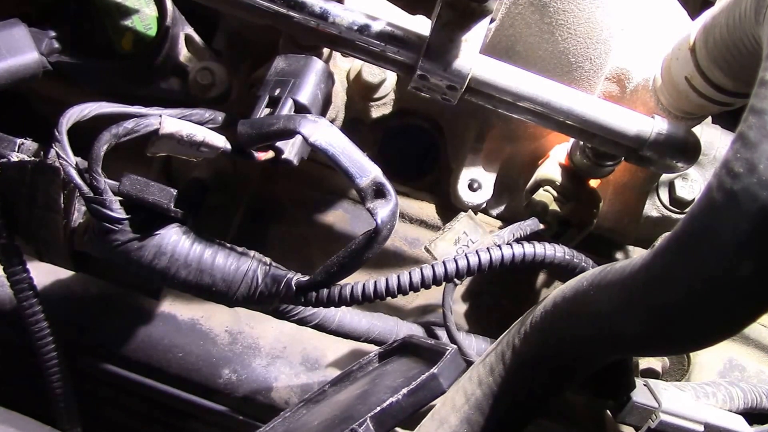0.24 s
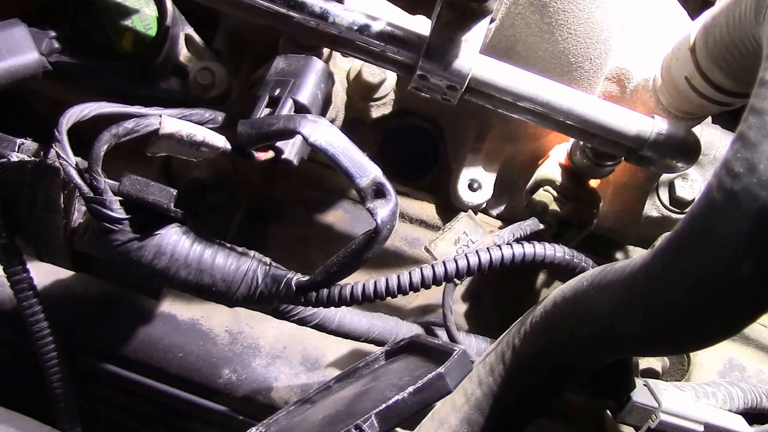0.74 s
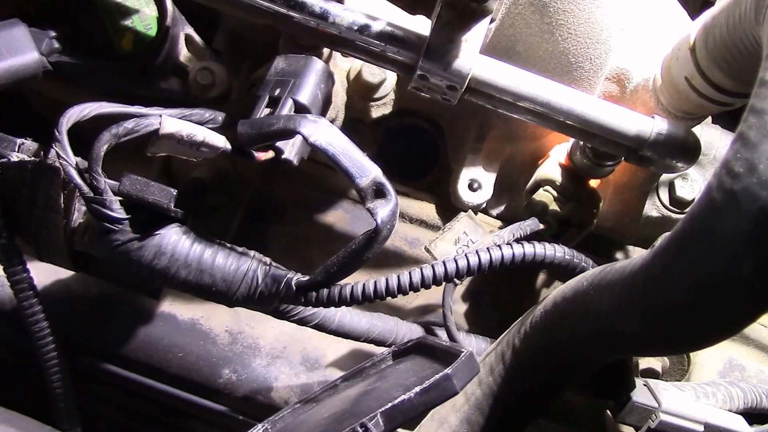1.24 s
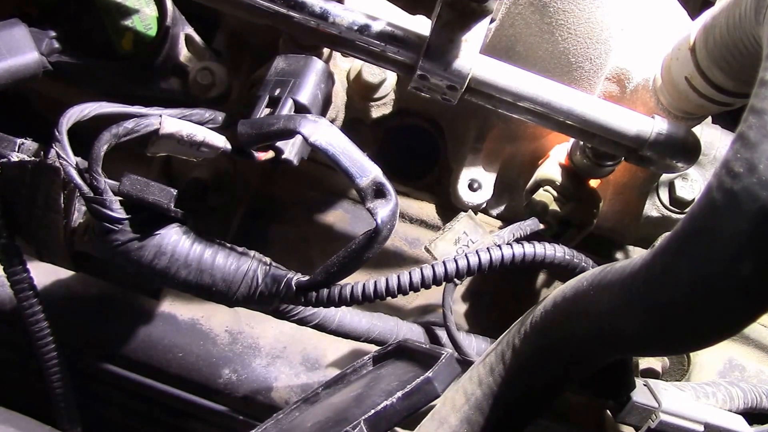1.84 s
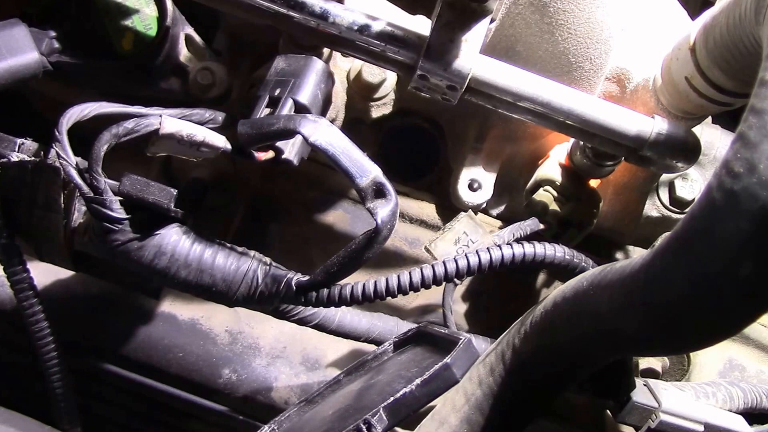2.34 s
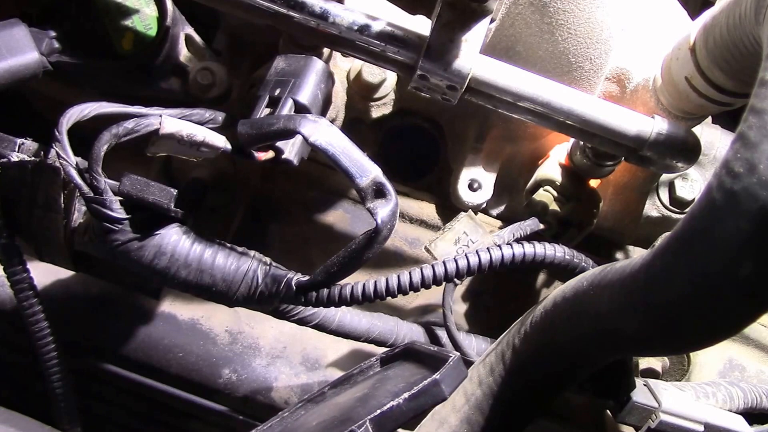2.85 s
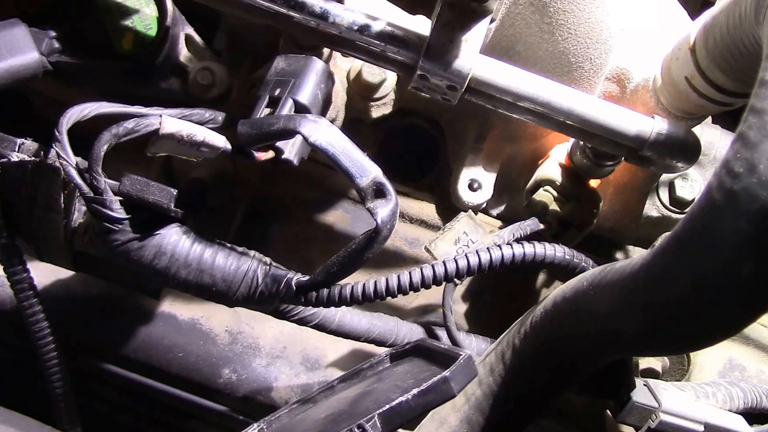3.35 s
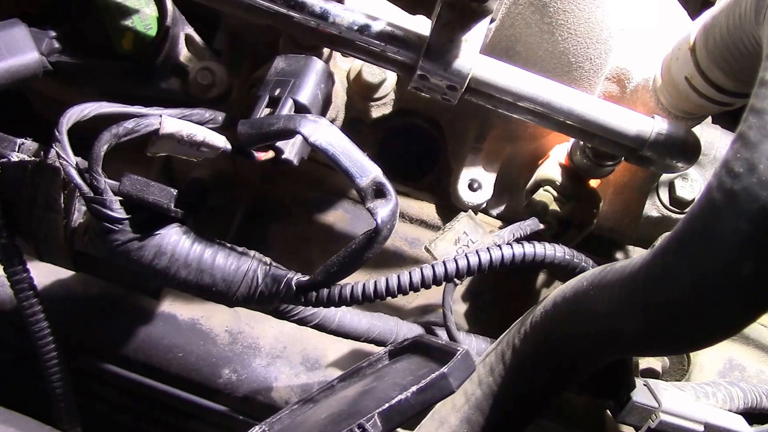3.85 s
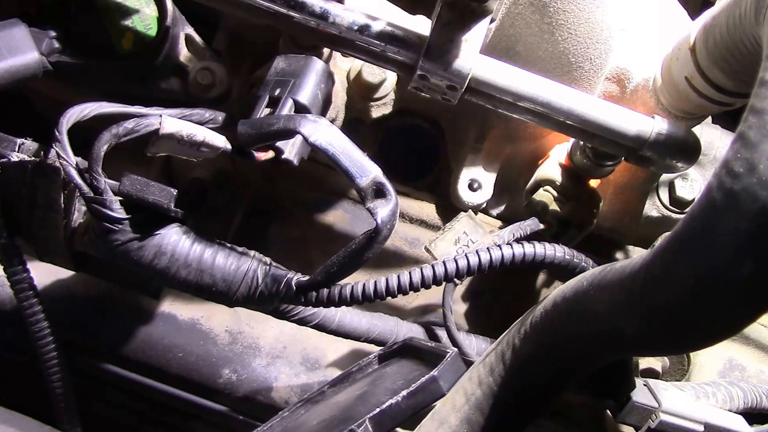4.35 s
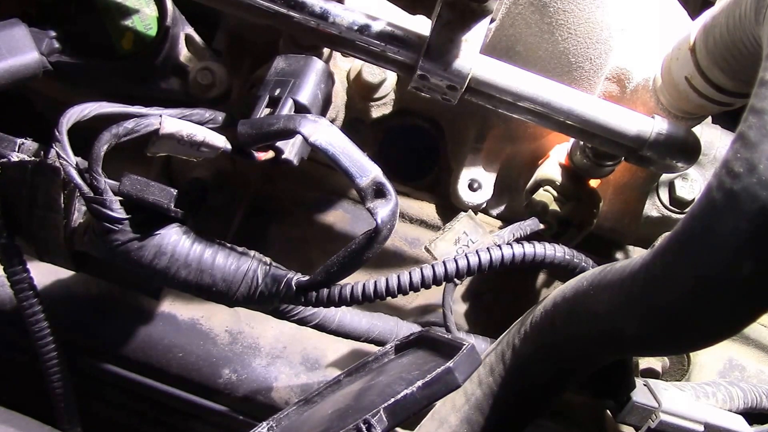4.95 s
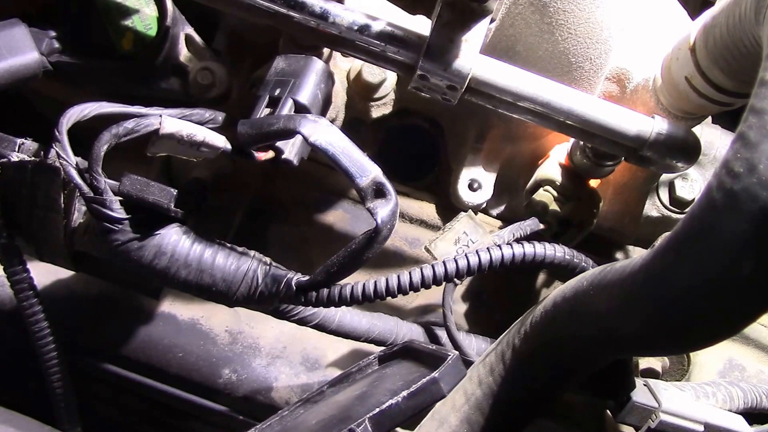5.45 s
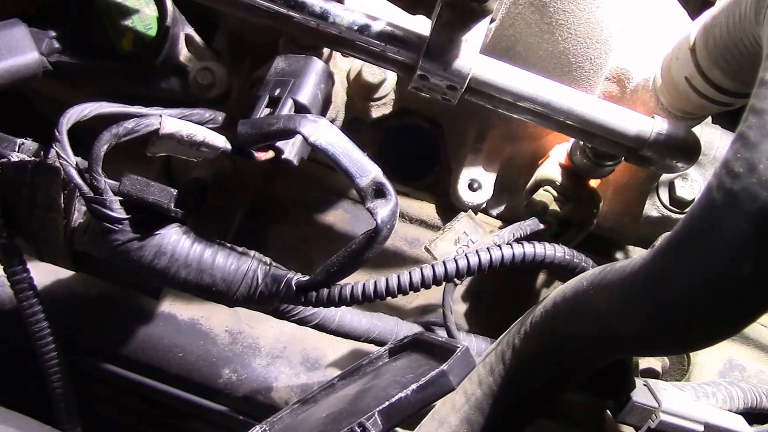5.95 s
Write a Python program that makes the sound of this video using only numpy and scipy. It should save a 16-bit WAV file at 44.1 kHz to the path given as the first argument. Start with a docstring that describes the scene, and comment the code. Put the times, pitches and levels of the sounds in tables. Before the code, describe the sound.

Steel hand tools are picked up, knocked together and put down on sheet metal close by. A short clatter opens, followed by a pause of about a second and another burst. Then comes a busier stretch of sharp knocks, high ringing clinks and brief scrapes as tools slide across the metal. The garage adds a short echo, and faint distant traffic hums underneath.

```python
"""A garage with an open door: steel hand tools are picked up, knocked and put down on sheet metal.
Each knock is a short clatter of tiny contacts, and loose tools ring on at their own pitches until a
hand stops them. Between knocks, things slide over the sheet. The room adds a short echo.
Far traffic, insects and one two-voiced bird chirp come in from outside."""
import sys
import numpy as np
from scipy import signal
from scipy.fft import rfft, irfft, next_fast_len
from scipy.io import wavfile
from scipy.ndimage import uniform_filter1d, map_coordinates

SR = 44100
rng = np.random.default_rng(int(sys.argv[2]) if len(sys.argv) > 2 else 0)


def dump_mix(stems):
    """Bounce the given channels to the path in sys.argv[1] as a 16-bit WAV at rate SR."""
    frames = np.atleast_2d(stems).T  # one column per channel
    limited = np.clip(frames, -1, 1)  # hard clip at full scale
    pcm = np.round(limited * 32767).astype(np.int16)
    wavfile.write(sys.argv[1], SR, pcm)


N = 273861


def amp(db):
    """Turn decibels into a number to multiply by."""
    return 10 ** (np.asarray(db) / 20)


def unit(x):
    """Scale a sound to an average (rms) level of 1."""
    return x / np.sqrt(np.mean(x ** 2) + 1e-20)


def along(points, hz):
    """Read between (Hz, value) points, giving each octave equal room."""
    point_hz, values = np.transpose(points)
    return np.interp(np.log(hz + 1), np.log(point_hz + 1), values)


def curves(rows):
    """Join rows of (seconds, values..) into one curve per value."""
    times, *columns = np.transpose(rows)
    return [np.interp(np.arange(N) / SR, times, column) for column in columns]


def wobble(rate, size=N):
    """A smooth curve through `rate` random values a second."""
    knots = rng.standard_normal(int(size * rate / SR) + 4)
    return map_coordinates(knots, [np.arange(size) * rate / SR])


def lowpass(hz, edge_hz, steepness):
    """A gain near 1 below the edge that falls toward 0 above it."""
    return 1 / (1 + (hz / edge_hz) ** steepness)


def filtered(x, response):
    """Scale each frequency of x by response(hz)."""
    size = next_fast_len(len(x) + 2048)
    return irfft(rfft(x, size) * response(np.fft.rfftfreq(size, 1 / SR)), size)[:len(x)]


def add(track, start_s, sound):
    """Mix a sound into the track."""
    spot = track[max(round(start_s * SR), 0):][:len(sound)]
    spot += sound[:len(spot)]


# The tone of the metal sheet, for knocks and slides. Each row: frequency in Hz, level in dB.
SHEET_TONE = [(35, -76), (60, -46.5), (666, 0.5), (2300, -2.5), (4030, -5), (6580, -7), (9130, -11),
              (9790, -9.5), (11000, -14.5), (14900, -26), (16000, -39)]
# Where a knock's body, clack, edge and tick have their levels set. Each row: from Hz, to Hz.
PART_BANDS = [(300, 1200), (1200, 4300), (5650, 6350), (9700, 10300)]
# Tools hitting the sheet. Each row: time in seconds, rough peak level of the clack in dB, its pitch
# in Hz, body level relative to the clack in dB, hardness in dB, seconds to fade by 60 dB.
SHEET_KNOCKS = [(0.0034, -16, 2560, -8, 3.3, 0.11), (0.0763, -23.5, 2670, -12, -5, 0.11),
                (0.302, -7, 2070, -13, -5.5, 0.13), (0.3464, -15.5, 1390, -12, 8, 0.18),
                (0.4299, -9.5, 3170, -18, 10.3, 0.12), (0.4647, -7, 3110, -11.5, -5, 0.13),
                (0.5321, -13.5, 2530, -14.5, 1.5, 0.097), (0.7141, -30, 2930, -13, -9, 0.08),
                (1.8566, -7, 1560, -15.5, 1.4, 0.091), (1.9286, -26, 2020, -11, -8, 0.15),
                (1.9737, -18, 3300, -15.5, 4, 0.19), (2.0276, -4.5, 3220, -17, 6.8, 0.078),
                (2.0479, -6, 1600, -15, 5, 0.1), (2.0747, -12, 3070, -7.5, 11.5, 0.13),
                (2.2058, -23, 4200, -12, 2.8, 0.12), (2.7807, -21.5, 2500, -20, -3, 0.11),
                (2.8433, -27, 1430, -9, -14, 0.14), (2.9419, -7.5, 3350, -15.5, 2.5, 0.15),
                (3.0283, -11, 2220, -10, -5.5, 0.13), (3.073, -15.5, 1900, -26, 3, 0.12),
                (3.1522, -11.5, 2300, -25, 3.2, 0.27), (3.2219, -1, 4550, -21, 0.1, 0.082),
                (3.4237, -27, 3000, -29, -5.2, 0.22), (3.7648, -6.5, 2200, -12, 2, 0.16),
                (3.7984, -10.5, 2080, -13.5, -9, 0.13), (3.8599, -13, 3700, -16.5, -18, 0.2),
                (3.9034, -13, 2570, -14, 4.5, 0.099), (3.9874, -19, 3740, -17, -2, 0.15),
                (3.9961, -11.5, 3740, -13.5, -5, 0.074), (4.0234, -16.5, 1663, -11, 0.1, 0.1),
                (4.0906, -21, 2730, -14, 0.5, 0.11), (4.2542, -19.5, 2510, -7.5, -4.5, 0.085),
                (4.3885, -20.5, 1980, -9, -18, 0.086), (4.4306, -31, 3060, -8, 2, 0.11),
                (4.4559, -19, 1520, -14, -2, 0.14), (4.4944, -12, 2500, -11.5, 0.8, 0.15),
                (4.6503, -16.5, 2700, -15, 7, 0.16), (4.7321, -1, 2300, -19.5, 2.6, 0.099),
                (4.7672, -3, 2340, -8, 3.3, 0.1), (4.7884, -7.5, 2410, -14.5, 4, 0.09),
                (4.8424, -9.5, 3080, -11, 5, 0.069), (4.962, -16.5, 2780, -9, 3, 0.078),
                (5.2554, -28.5, 1280, -8, 3.5, 0.083), (5.3974, -31.5, 4040, -8, 9, 0.088),
                (5.5487, -18.5, 2390, -13, -0.7, 0.15), (5.6358, -9.5, 2080, -5, -2.5, 0.071),
                (5.6543, -18, 2410, -3, 0, 0.062), (5.7715, -18, 3260, -25, -1, 0.11),
                (5.7786, -18, 3160, -12, 6, 0.12), (5.7978, -14.5, 1290, -14, 8, 0.15),
                (5.9125, -3.5, 1730, -9, 7.2, 0.11), (5.9334, -5, 2500, -10.5, -12, 0.1),
                (6.1976, -33.5, 3320, -18, 0.1, 0.12)]


def knocks():
    """A cluster of tiny contacts makes a low body, a pitched clack, a bright edge and a high tick."""
    out, t = np.zeros(N), np.arange(SR // 3) / SR
    hz = np.fft.rfftfreq(len(t), 1 / SR)
    below = [lowpass(hz, edge_hz, 6) for edge_hz in (1200, 4500, 8000)]
    parts = np.diff([np.zeros_like(hz), *below, np.ones_like(hz)], axis=0)
    bands = np.array([(hz > low) & (hz < high) for low, high in PART_BANDS])
    rise_s, crest_db = 0.0033, 4  # the crest is how far peaks stand above the average
    for time_s, db, clack_hz, body_db, hard_db, fade_s in SHEET_KNOCKS:
        contacts = unit(rng.standard_normal(len(t)) * amp(2.3 * wobble(242, size=len(t))))
        # random bumps in the tone make every knock a little different
        bumps_db = 1.5 * map_coordinates(rng.standard_normal(80), [12 * np.log(hz / 40 + 1)])
        clack_db = 4 / (1 + (5 * np.log2((hz + 1) / clack_hz)) ** 2)
        sheet = amp(along(SHEET_TONE, hz) + clack_db)
        edge_db, tick_db = -10.5 + hard_db, -25.5 + 1.1 * hard_db  # harder is brighter
        band_levels = np.sqrt(bands @ sheet ** 2 / len(hz))
        gains = amp([body_db, 0, edge_db, tick_db]) / band_levels
        clatter = irfft(rfft(contacts) * sheet * amp(bumps_db) * (gains @ parts), len(t))
        shape = (1 - np.exp(-t / rise_s)) ** 2 * amp(-60 * t / fade_s)
        add(out, time_s - .0045, amp(db - crest_db) * shape * clatter)
    return out


# The tone of far traffic. Each row: frequency in Hz, level in dB.
TRAFFIC_TONE = [(15, -69), (25, -46.5), (223, -8.5), (463, -8.5), (503, -6.5), (775, -5.5), (840, -7.5),
                (1100, -7.5), (1330, -11.5), (2690, -14), (9840, -24), (11300, -30.5), (16000, -43)]
# The background hiss. Each row: time in seconds, change of the treble in dB.
BACKGROUND_HISS = [(.25, 1.5), (.8, 4.5), (1.3, 0), (1.8, -3), (2.4, 1.5), (3.55, 3.5), (5.1, 3.5)]


def traffic_and_hiss():
    """Far traffic rumbles; background hiss lingers after the first knocks, then dips and returns."""
    roar = unit(filtered(rng.standard_normal(N), lambda hz: amp(along(TRAFFIC_TONE, hz))))
    hiss = filtered(roar, lambda hz: 1 - lowpass(hz, 1500, 4))
    rumble = roar - hiss
    hiss_db, = curves(BACKGROUND_HISS)
    return amp(-51.5 + 0.29 * wobble(5.4)) * (rumble + amp(hiss_db) * hiss)


# Insects outside. Each row: pitch in Hz, width of the band in Hz, level in dB.
INSECT_BANDS = [(11020, 210, -68), (13000, 400, -76)]


def insects():
    """Insects are heard as high, narrow bands of noise that throb."""
    out = np.zeros(N)
    for pitch_hz, width_hz, db in INSECT_BANDS:
        band = filtered(rng.standard_normal(N), lambda hz: 1 / (1 + (2 * (hz - pitch_hz) / width_hz) ** 2))
        out += amp(db + 1.7 * wobble(25)) * unit(band)
    return out


# How long the room echoes. Each row: frequency in Hz, seconds to fade by 60 dB.
ECHO_FADES = [(200, 0.76), (1000, 0.4), (4000, 0.36), (10000, 0.24), (16000, 0.29)]


def garage_echo(x):
    """A short, smooth room echo in which each frequency dies at its own speed."""
    out, step = np.zeros(N), SR // 5
    for start in range(0, N, step):  # drawn afresh from noise every fifth of a second
        hz, t, noise = signal.stft(rng.standard_normal(SR // 2), SR, nperseg=256)
        fade = amp(-60 * t / along(ECHO_FADES, hz)[:, None])
        _, tail = signal.istft(noise * fade, SR, nperseg=256)
        echo = signal.fftconvolve(x[start:start + step], tail / np.linalg.norm(tail))
        add(out, start / SR + .005, echo)
    return out


# Things dragged over the sheet. Each row: start, loudest moment and end in seconds,
# level in dB, brightness in dB (turns the sharp part up and the dull part down).
SHEET_SLIDES = [(.24, .29, .31, -47, 7), (2.61, 2.92, 3.03, -40, 7.5), (2.92, 3.095, 3.416, -26.5, 4),
                (3.57, 3.679, 3.838, -35, 13), (4.04, 4.115, 11, -50.5, -5), (4.587, 4.752, 4.77, -21, 5),
                (4.826, 4.889, 4.93, -28, 1.5), (5.173, 5.214, 5.3, -60, 10)]


def slides():
    """Steel dragged over the sheet makes dense, uneven grains that swell and ease off."""
    level, bright_db, t = np.zeros(N), np.zeros(N), np.arange(N) / SR
    for start, loudest, end, db, brightness in SHEET_SLIDES:
        sliding = (t >= start) & (t < end)
        swell_db = np.interp(t[sliding], [start, loudest, end], [-26.5, 0, -16.5])
        level[sliding] = amp(db + swell_db)
        bright_db[sliding] = brightness

    def sharp_tone(hz):
        tilt_db = -9.5 * np.log2(hz / 2500 + 1)
        return amp(along(SHEET_TONE, hz) + tilt_db) * (1 - lowpass(hz + 1, 2500, 2))

    grains = rng.standard_normal(N) * amp(1.2 * wobble(180) + 2.6 * wobble(35))
    dull = unit(filtered(grains, lambda hz: amp(along(SHEET_TONE, hz)) * lowpass(hz, 2500, 2)))
    sharp = unit(filtered(grains, sharp_tone))
    scrape = (amp(-bright_db) * dull + amp(bright_db) * sharp) / 2
    return uniform_filter1d(level, size=400) * scrape


def ringing(modes, hardness, t):
    """A struck tool sounds all its own pitches (modes) at once; a hard blow favours the high ones."""
    hz, level_db, fade_s = np.array(modes)[:, :, None]
    level_luck, phase_luck = rng.standard_normal((2, len(hz), 1))
    level_db = level_db + hardness * np.log2(hz / 7000) + 1.5 * level_luck
    # the tool chatters on what it touches, so each mode flutters in level and phase
    flutter_db = 3 * np.array([wobble(46, size=len(t)) for _ in hz])
    phase_slip = 0.9 * np.array([wobble(40, size=len(t)) for _ in hz])
    tones = np.sin(2 * np.pi * hz * t + np.pi * phase_luck + phase_slip)
    return np.sum(amp(level_db + flutter_db - 60 * t / fade_s) * tones, axis=0)


# How the tools ring. Each tool has three lists: pitches in Hz, levels in dB, seconds to fade by 60 dB.
TOOL_MODES = { "ratchet": ([3260, 4823, 4915, 5518, 6980, 7088, 8640, 9447, 11305, 12468, 13600, 15122, 15300],
              [-10, -7, -6, -9, -2, -2, -13, -4, -14, -23, -26, -29, -26],
              [.12, .33, .3, .6, .3, .4, .4, .26, .3, .3, .25, .25, .12]),
              "extension": ([1440, 2500, 2980, 6515, 6955, 7655, 8865, 10850, 11654, 13030, 13910, 14280, 14922],
              [-21, -19, -14, -3, 0, -9, -9, -18, -5, -20, -24, -21, -22],
              [.15, .15, .2, .18, .28, .45, .25, .19, .2, .14, .2, .18, .2]),
              "socket": ([3716, 5119, 5184, 6803, 6855, 7800, 8552, 10430, 10570, 12905, 13110, 14570, 15500],
              [-7, 0, -8, -9, -9, -13, -10, -13, -11, -18, -15, -26, -26],
              [.3, .42, .4, .3, .3, .3, .3, .25, .3, .2, .2, .15, .2]),
              "bit": ([4468, 5465, 8365, 8908, 11330, 11880, 12550], [-8, -5, -3, 0, -6, -10, -22],
              [.15, .15, .13, .25, .12, .23, .2]), "spanner": ([5420, 8900, 9900], [0, -21, -18],
              [.08, .2, .3]), "bolt": ([8700, 15300], [0, -15], [.15, .25]), "bracket": ([6405], [0], [.4]),
              "clamp": ([2020], [0], [.1]), "washer": ([4080], [0], [.15]), "nut": ([9650], [0], [.1]), }
# Blows that ring a tool. Each row: start in seconds, level in dB, hardness in dB per octave,
# seconds of free ringing, name of the tool.
TOOL_BLOWS = [ (0.347, -21.5, 6, 0.074, "ratchet"), (.429, -16.5, -7.5, 0.054, "extension"),
              (.431, -22.5, -8, .35, "ratchet"), (.447, -17, 2, .2, "extension"),
              (0.497, -29, 2, 0.13, "extension"), (0.71, -53, -12.5, .1, "extension"),
              (1.905, -42, -13, .07, "ratchet"), (1.975, -20, 2, 0.01, "ratchet"),
              (1.988, -17.5, -3.5, 0.034, "ratchet"), (2.032, -11, 4, 0.012, "ratchet"),
              (2.052, -14, 3, 0.046, "ratchet"), (2.074, -21, 3, 0.016, "extension"),
              (2.09, -28.5, 11, 0.105, "ratchet"), (2.206, -26.5, 6, 0.088, "nut"),
              (2.207, -43, 9, 0.068, "ratchet"), (2.81, -38, -3, .03, "washer"),
              (2.875, -61, 0, .06, "socket"), (2.943, -35.5, 18, 0.035, "bit"),
              (3.085, -30.5, 7, .04, "socket"), (3.143, -25, 2, 0.017, "nut"),
              (3.221, -24.5, -5, 0.037, "socket"), (3.73, -30.5, -1, 0.022, "clamp"),
              (3.798, -18.5, 1.5, 0.048, "socket"), (3.858, -19.5, -4, 0.05, "socket"),
              (3.91, -27.5, 4.5, 0.054, "socket"), (3.997, -22.5, 5, 0.05, "socket"),
              (4.03, -28.5, 2, 0.079, "socket"), (4.429, -39, 2, .06, "bolt"),
              (4.455, -30.5, -4, 0.045, "socket"), (4.494, -33, 3, .1, "bolt"),
              (4.647, -25.5, 0, 0.089, "bit"), (4.768, -15, 6, .02, "nut"),
              (4.839, -35.5, 10, 0.038, "bit"), (4.96, -45.5, 15, .1, "bit"),
              (5.55, -21, -15, 0.13, "spanner"), (5.781, -25, 2, .05, "bolt"),
              (5.796, -30, 3, 0.13, "ratchet"), (5.797, -20, -4, 0.026, "bit"),
              (5.835, -41, 11, .04, "bolt"), (5.912, -25, 13, 0.39, "bracket")]


def clinks():
    """Each blow rings a loose tool until a touch quiets it."""
    out, t = np.zeros(N), np.arange(SR // 2) / SR
    attack = 1 - np.exp(-t / 0.00066)
    for start, db, hardness, free_s, tool in TOOL_BLOWS:
        touch_db = -900 * np.maximum(t - free_s, 0)
        add(out, start, amp(db + touch_db) * attack * ringing(TOOL_MODES[tool], hardness, t))
    return out


# The bird's upper voice drops and swells. Each row: time in seconds, pitch in Hz, dB over the lower.
UPPER_VOICE = [(5.12, 4520, -7), (5.14, 4000, 2)]
# Its lower voice dips once. Each row: time in seconds, pitch in Hz.
LOWER_VOICE = [(5.12, 3800), (5.14, 3450), (5.16, 3770)]


def bird():
    """Both sides of a bird's voice box sing at once, each a little rough, in one short chirp."""
    start_s, attack_s, hold_s = 5.098, 0.0092, 0.049
    voices, t = np.zeros(N), np.arange(N) / SR - start_s
    fade_db = -400 * np.maximum(t - attack_s - hold_s, 0)
    shape = np.clip(t / attack_s, 0, 1) ** 2 * amp(-44.5 + fade_db)
    upper_hz, upper_db = curves(UPPER_VOICE)
    lower_hz, = curves(LOWER_VOICE)
    for hz, db in (upper_hz, upper_db), (lower_hz, 0):
        rough_level = amp(db + 3.5 * wobble(92))
        rough_hz = hz + 50 * wobble(200)
        voices += rough_level * np.sin(2 * np.pi * np.cumsum(rough_hz) / SR)
    return shape * voices


def scene():
    """Mix the tools, the bird and their echo with the traffic, hiss and insects."""
    clatter, ring, chirp = knocks() + slides(), clinks(), bird()
    echo = garage_echo(amp(-4.5) * clatter + amp(-13) * ring + amp(-6) * chirp)
    room = clatter + ring + chirp + echo
    room = filtered(room, lambda hz: 1 - lowpass(hz, 130, 4))  # cut the rumble below 130 Hz
    return (room + traffic_and_hiss() + insects())[None]


def record(dry):
    """Round off the highest peaks, then cut everything above 16000 Hz."""
    ceiling = 0.97
    rounded = dry[0] / (1 + np.abs(dry[0] / ceiling) ** 5) ** (1 / 5)
    return filtered(rounded, lambda hz: hz < 16000)[None]


dry = scene()
out = record(dry)
dump_mix(out)
```